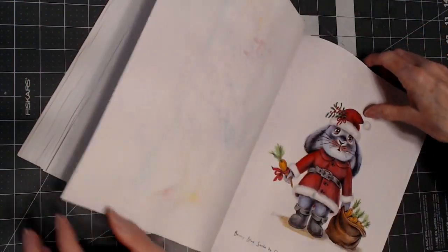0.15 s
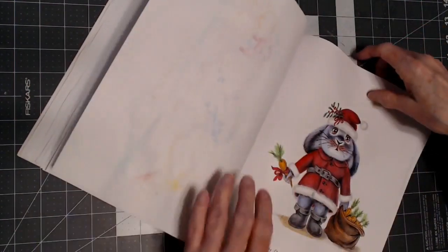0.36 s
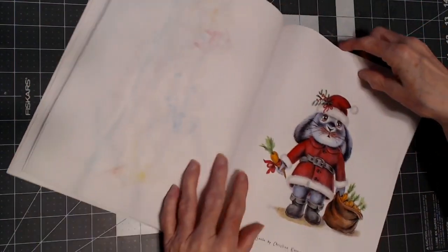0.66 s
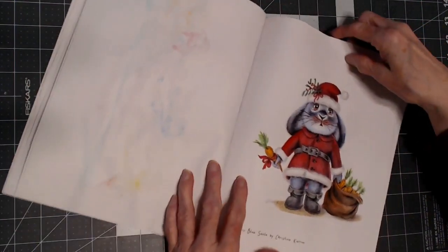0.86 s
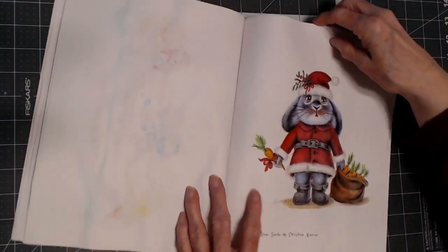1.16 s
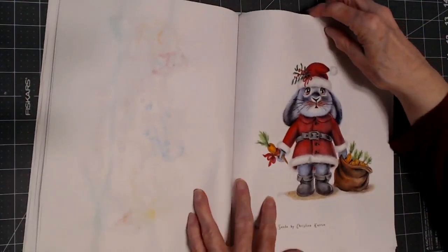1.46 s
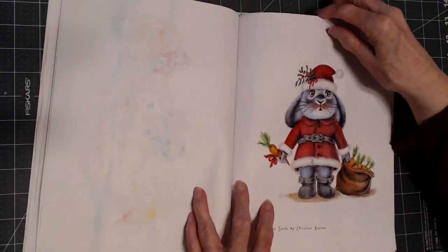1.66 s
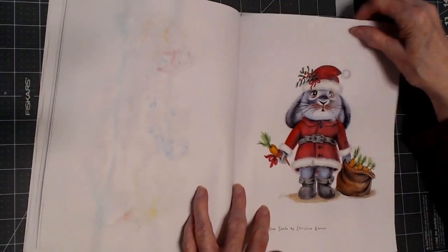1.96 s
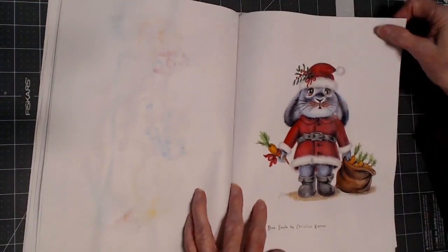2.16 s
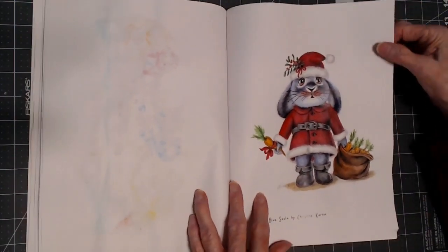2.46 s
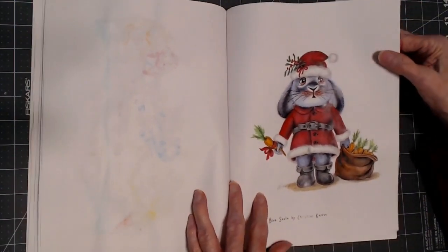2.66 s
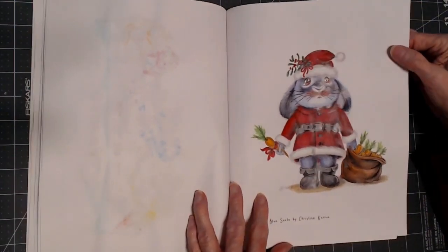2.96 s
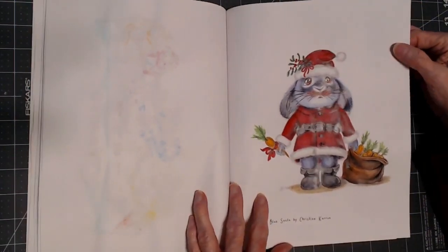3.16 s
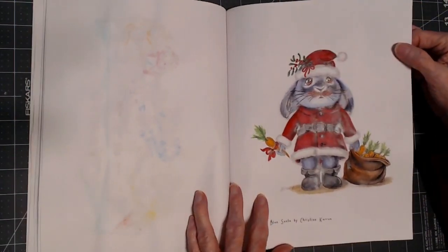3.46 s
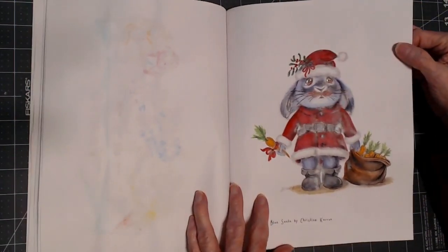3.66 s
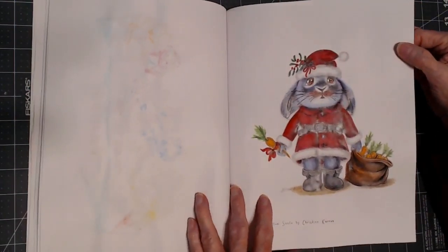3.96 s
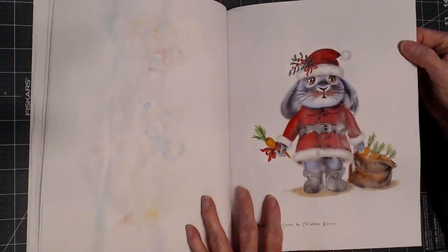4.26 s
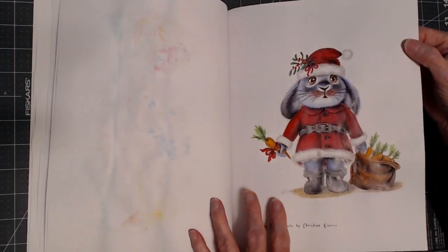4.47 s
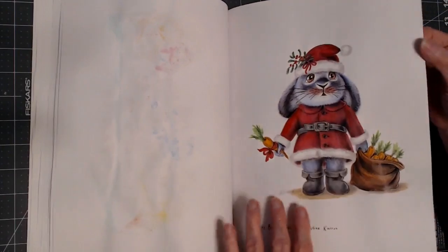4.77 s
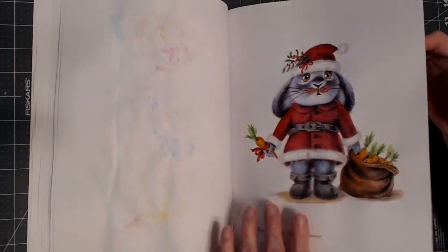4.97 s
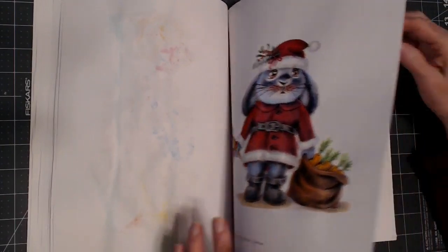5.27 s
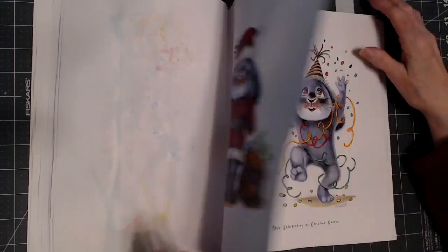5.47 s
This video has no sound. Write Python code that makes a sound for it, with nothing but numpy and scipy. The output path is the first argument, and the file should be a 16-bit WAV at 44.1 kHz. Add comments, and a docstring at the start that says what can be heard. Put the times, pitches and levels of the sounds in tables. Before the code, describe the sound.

Stiff paper page snaps over and is smoothed with dry rustles, then quiet, then more turning as a vehicle pulls away outside.

```python
"""Turning the pages of a large picture book

A page flops over, a palm smooths it, fingers slide to the corner and lift the next page.
Short noise bursts make the snaps of the stiff sheets; random grains through filters make hiss and hollow rubbing.
From halfway on a vehicle pulls away outside: sine tones of rising pitch over low, filtered noise."""
import sys
import numpy as np
from scipy import signal
from scipy.fft import rfft, irfft, next_fast_len
from scipy.io import wavfile
from scipy.ndimage import uniform_filter1d

SR = 44100
rng = np.random.default_rng(int(sys.argv[2]) if len(sys.argv) > 2 else 0)


def materialize(psi):
    """Save the field psi as 16-bit PCM at rate SR to the path in sys.argv[1].

    A 1-D psi becomes a single channel; in a 2-D psi each row is a channel.
    """
    bounded = np.clip(np.atleast_2d(psi).T, -1, 1)
    quanta = np.round(bounded * 32767).astype(np.int16)
    wavfile.write(sys.argv[1], SR, quanta)


N = 247842   # length in samples


def from_db(db):
    """Turn decibels into a gain."""
    return 10 ** (np.asarray(db) / 20)


def rms_one(x):
    """Scale a sound to an average strength (rms) of 1."""
    return x / np.sqrt(np.mean(x ** 2) + 1e-20)


def in_time(rows):
    """Join the points of each curve with straight lines, one value per sample."""
    seconds, *columns = np.transpose(rows)
    return [np.interp(np.arange(N) / SR, seconds, column) for column in columns]


def at_hz(points, hz):
    """Read a spectrum between its points, on a log-frequency axis."""
    point_hz, value = np.transpose(points)
    return np.interp(np.log(hz + 1), np.log(point_hz), value)


def panned(x, pan_db):
    """Make the left channel louder than the right by pan_db; a negative value leans right."""
    return x * from_db(np.array([[.5], [-.5]]) * pan_db)


def drift(rate_hz):
    """Smooth, slow noise with spread 1; a higher rate wanders faster."""
    step = 40   # computed at every 40th sample, then joined up
    r = np.exp(-2 * np.pi * rate_hz * step / SR)
    noise = rng.standard_normal(N // step + 2002)
    slow = signal.lfilter([1], [1, -2 * r, r * r], noise)[2000:]
    return np.interp(np.arange(N) / step, np.arange(len(slow)), rms_one(slow))


# How wide the stereo sound is. Each row: frequency in Hz, level of side over mid in dB.
STEREO_WIDTH = [(25, -10), (90, -17), (300, -10), (700, -12), (1400, -2.5), (3000, -0.5), (9000, -10.5),
                (15000, -7.5)]


def coloured(pair, colour):
    """Filter two unrelated signals, as mid and side, into a stereo sound of this colour; rms 1."""
    n = pair.shape[1]
    size = next_fast_len(n)
    hz = np.arange(size // 2 + 1) * SR / size
    top_fade = 1 + (hz / (2 * colour[-1][0])) ** 2   # fades the treble beyond the last point
    mid, side = rfft(pair, size) * from_db(at_hz(colour, hz)) / top_fade
    side = side * from_db(at_hz(STEREO_WIDTH, hz))
    return rms_one(irfft([mid + side, mid - side], size)[:, :n])


def resonate(x, hz, width_hz):
    """Ring at one frequency: a resonance with a peak gain of about 1."""
    r = np.exp(-np.pi * width_hz / SR)
    feedback = [1, -2 * r * np.cos(2 * np.pi * hz / SR), r * r]
    return signal.lfilter(np.array([1, 0, -1]) * (1 - r * r) / 2, feedback, x)


def glide(x, hz, width_hz, size=256, order=2):
    """A steep resonance whose pitch and width move block by block, at even power; rms 1."""
    radius = np.exp(-np.pi * np.abs(width_hz) / SR)
    out = x.copy()
    for _ in range(order):
        state = np.zeros((2, 2))
        for i in range(0, N, size):
            r = radius[i]
            feedback = [1, -2 * r * np.cos(2 * np.pi * hz[i] / SR), r * r]
            block = (1 - r * r) / 2 * out[:, i:i + size]
            out[:, i:i + size], state = signal.lfilter([1, 0, -1], feedback, block, zi=state)
    return rms_one(out / np.sqrt(1 - radius))


def held(start, length, attack_s, release_s):
    """A loudness curve that rises, holds until its length is over and dies away."""
    t = np.arange(N) / SR - start
    return np.clip(t / attack_s, 0, 1) * np.exp(-np.maximum(t - length, 0) / release_s)


def off_table(x, strengths):
    """Table, hands and nearby pages throw sound back within 4 ms, colouring it at about the same power."""
    out, n = x.copy(), x.shape[1]
    for strength in strengths:
        lag = int(rng.uniform(.0003, .004) * SR)
        out += strength * np.pad(x, [(0, 0), (lag, 0)])[:, :n]
    return out / np.sqrt(1 + np.sum(np.square(strengths), axis=0))


# Colour of the quiet room. Each row: frequency in Hz, level in dB.
ROOM_COLOUR = [(20, -1), (53, -19.5), (107, -5.5), (204, -21.5), (480, -29), (610, -24), (800, -33),
               (4060, -52.5), (16000, -60)]


def quiet_room(level_db=-61.5):
    """Soft, steady filtered noise is the sound of the quiet room."""
    return from_db(level_db) * coloured(rng.standard_normal((2, N)), ROOM_COLOUR)


# Faint high tones. Each row: frequency in Hz, level in dB relative to the hum.
FAINT_HIGH_TONES = [(3900, -46.5), (7800, -52.5), (11750, -56)]


def faint_high_tones(hum):
    """Faint high tones that follow the level of the hum: it is multiplied by wandering sines."""
    tones = 0
    for hz, db in FAINT_HIGH_TONES:
        turn = 2 * np.pi * np.cumsum(hz + 10 * drift(40)) / SR
        tones = tones + hum * from_db(db) * np.sin(turn)
    return tones


# Two tiny dry clicks. Each row: time in seconds, strength at the start in dB.
DRY_CLICKS = [(3.4276, -46.5), (3.928, -39)]
# Colour of the clicks. Each row: frequency in Hz, level in dB.
CLICK_COLOUR = [(800, -6), (5000, 0), (15000, -8)]


def clicks(fade_s=.00012):
    """Two tiny dry clicks: noise that starts at once and dies within a millisecond."""
    t = np.arange(N) / SR
    strength = 0
    for s, db in DRY_CLICKS:
        strength = strength + from_db(db) * (t >= s) * np.exp(-np.abs(t - s) / fade_s)
    return strength * coloured(rng.standard_normal((2, N)), CLICK_COLOUR)


# Room modes set booming by the rumble. Each row: start in seconds, length in seconds,
# pitch in Hz, level in dB (around which it wavers).
ROOM_BOOMS = [(2.742, 0.043, 105.8, -47), (2.784, 0.15, 104, -40.5), (2.993, 0.052, 106.3, -44.5),
              (3.211, 0.038, 104.1, -49.5), (3.311, 0.032, 99.4, -35), (4.03, 0.49, 106, -45.5),
              (4.65, 0.83, 106.1, -44.5), (4.539, 0.092, 281, -53), (4.766, 0.9, 374.8, -60.5),
              (5.429, 0.13, 227.7, -48)]


def booms(attack_s=0.04, release_s=0.025, pitch_wander_hz=7.42 / 2, waver_db=3):
    """Each room mode is a slightly wandering sine that swells unevenly."""
    out = 0
    for start, length, hz, db in ROOM_BOOMS:
        turn = 2 * np.pi * np.cumsum(hz + pitch_wander_hz * drift(14.4)) / SR
        uneven_db = waver_db * np.tanh(drift(23))
        out = out + held(start, length, attack_s, release_s) * from_db(db + uneven_db) * np.sin(turn)
    return out


# The vehicle gathers speed. Each row: time in seconds, engine firing rate in Hz,
# level of the drone in dB before the drone gain.
ENGINE_SPEED = [(3.36, 94.7, -38), (3.54, 100.5, -30), (3.76, 108.8, -27), (3.8, 114.9, -36),
                (3.89, 115.6, -31), (4.0, 116.6, -28), (4.22, 132.3, -39.5), (4.4, 132.8, -45),
                (4.51, 141.3, -35.5), (4.57, 139.3, -51.5), (4.66, 142.9, -36.5), (4.83, 145.1, -53),
                (4.9, 149, -36.5), (5.12, 157.2, -63), (5.15, 155.1, -38.5), (5.4, 162, -49.5),
                (5.5, 169, -70)]
# Overtones of the engine. Each row: multiple of the firing rate, level in dB relative to the road noise.
OVERTONES = [(1.5, -18.5), (2, -10.5)]
# Noise of the vehicle. Each row: time in seconds, road noise in dB, deep rumble in dB.
VEHICLE_NOISE = [(0, -78.5, -79), (2.7, -81, -72.5), (2.82, -62.5, -54.5), (3.22, -82.5, -60.5),
                 (3.36, -61.5, -58.5), (4.05, -48.5, -54.5), (4.5, -53.5, -58.5), (5.62, -47.5, -58)]
# Colours of the road noise and the rumble. Each row: frequency in Hz, level in dB.
ROAD_COLOUR = [(25, -14.5), (55, 0), (80, -3.5), (140, 4.5), (230, -1), (300, -11.5), (400, -12.5),
               (550, -28), (900, -37)]
RUMBLE_COLOUR = [(20, -8), (30, -5.5), (55, 2.5), (80, -8.5), (200, -38.5)]


def vehicle(waver=0.0097, drone_gain_db=-2.0, overtone_waver_db=5, overtone_wander=0.98):
    """Only the lowest engine tones pass the wall: returns the hum (drone, booming room) and the rest."""
    t = np.arange(N) / SR
    firing_hz, drone_db = in_time(ENGINE_SPEED)
    road_db, rumble_db = in_time(VEHICLE_NOISE)
    turn = 2 * np.pi * np.cumsum(firing_hz * (1 + waver * drift(34))) / SR
    pulling = np.clip((t - ENGINE_SPEED[0][0]) / .07, 0, 1)   # the engine fades in over 70 ms
    shudder_db = 1.6 * drift(14)
    drone = pulling * from_db(drone_db + drone_gain_db + shudder_db) * np.sin(turn) * np.sqrt(2)
    # a four-stroke engine sounds whole and half multiples; their paths through the street keep shifting
    overtones = 0
    for multiple, db in OVERTONES:
        strength = from_db(road_db + db + overtone_waver_db * drift(3.1))
        overtones = overtones + pulling * strength * np.sin(multiple * turn + overtone_wander * drift(10))
    road = from_db(road_db) * coloured(rng.standard_normal((2, N)), ROAD_COLOUR)
    rumble = from_db(rumble_db) * coloured(rng.standard_normal((2, N)), RUMBLE_COLOUR)
    return drone + booms(), overtones + road + rumble


# After a buckle or a soft touch the whole sheet flaps. Each row: time in seconds, level in dB, pitch in Hz.
SHEET_FLAPS = [(0.104, -44.5, 434), (0.463, -52.5, 566), (0.574, -54, 553), (1.592, -65.5, 780),
               (1.917, -57.5, 350), (4.213, -49.5, 648.3), (4.412, -63, 600), (4.96, -50, 430),
               (5.078, -39, 319.4), (5.135, -53.5, 465), (5.385, -43.5, 544), (5.498, -51, 296)]
# Colour of a flap. Each row: frequency in Hz, level in dB.
PUFF_COLOUR = [(190, -31), (330, -2.5), (600, 3), (1800, -43)]


def flaps(rise_s=0.0028, t60=0.18, width_hz=130):
    """The whole sheet swings and pushes a soft, low puff of air: a short noise through a resonance."""
    out = np.zeros((2, N + SR))
    t = np.arange(SR // 2) / SR
    for s, db, hz in SHEET_FLAPS:
        strength = np.minimum(t / rise_s, 1) * from_db(-60 * t / t60)
        push = rng.standard_normal((2, len(t))) * strength
        puff = resonate(coloured(push, PUFF_COLOUR), hz, width_hz)
        puff = puff / np.sqrt(np.mean(puff[:, t < .04] ** 2))   # rms 1 over the first 40 ms
        i = round(s * SR)
        out[:, i:i + len(t)] += from_db(db) * puff
    return out[:, :N]


# A hand or a page slides over the paper. Each row: start in seconds, length in seconds, swell in dB
# from start to end, then levels in dB, before the gains in sliding(), of the friction hiss,
# the sheet flutter, the air pocket and the sheet ring.
SLIDING_STROKES = [(-0.02, 0.12, -6, -57.5, -65, -100, -86), (0.086, 0.12, -12, -66, -60, -50.5, -85),
                   (0.147, 0.23, 24.5, -51.5, -59.5, -54.5, -62), (0.348, 0.1, -8, -52.5, -50, -60.5, -69),
                   (0.367, 0.47, -0.5, -61, -62.5, -60, -71), (0.815, 0.27, -27, -62.5, -58.5, -57.5, -94),
                   (1.023, 0.32, -5, -69, -74.5, -69, -78), (1.212, 0.07, 11, -59.5, -66, -64, -68),
                   (1.348, 0.19, -26, -73, -85.5, -72, -102), (1.52, 0.83, -7, -64.5, -76.5, -77, -77.5),
                   (1.703, 0.13, -15, -83, -71, -91, -62), (1.846, 0.083, 6.5, -53, -58, -53, -49.5),
                   (1.926, 0.089, -42.5, -45.5, -49, -43, -53), (1.97, 0.19, 1, -89, -79, -69, -70.5),
                   (2.143, 0.35, 6, -66, -75.5, -83, -80.5), (2.509, 0.26, 6.5, -79.5, -83.5, -81.5, -99.5),
                   (2.858, 0.23, 2.5, -83, -79.5, -80, -76), (3.668, 0.035, 1, -65.5, -68.5, -70.5, -82.5),
                   (4.026, 0.097, -11.5, -71.5, -63, -54.5, -78), (4.388, 0.14, -6.5, -68, -63.5, -70, -79),
                   (4.446, 0.017, -10, -78, -68, -78, -48), (4.537, 0.2, -9.5, -62.5, -68, -91, -69),
                   (4.753, 0.18, 3, -74, -79, -81, -92.5), (4.931, 0.11, -7, -67.5, -62, -73, -82),
                   (5.123, 0.24, -25, -73.5, -89, -83, -63), (5.351, 0.04, 3, -58.5, -44, -53, -46),
                   (5.456, 0.055, -7, -54.5, -52, -39, -59)]


def strokes(attack_s=0.052, release_s=0.02, ease_in_share=0.14, hiss_follows=0.48):
    """Each stroke sets in, swells or eases with pressure and lets go: gains of hiss, flutter, pocket, ring."""
    t = np.arange(N) / SR
    hiss, flutter, pocket, ring = 0, 0, 0, 0
    for start, length, swell_db, hiss_db, flutter_db, pocket_db, ring_db in SLIDING_STROKES:
        # a long stroke sets in more gently
        touch = held(start, length, attack_s + ease_in_share * length, release_s)
        pressure = from_db(swell_db * (np.clip((t - start) / length, 0, 1) - .5))
        power = (touch * pressure) ** 2
        # only a share of the swell reaches the hiss
        hiss = hiss + (from_db(hiss_db) * touch * pressure ** hiss_follows) ** 2
        flutter = flutter + from_db(flutter_db) ** 2 * power
        pocket = pocket + from_db(pocket_db) ** 2 * power
        ring = ring + from_db(ring_db) ** 2 * power
    return np.sqrt([hiss, flutter, pocket, ring])


def fibres(per_s, spread_db):
    """Fibres catch and let go: random slips of uneven size."""
    slips = rng.random(N) < per_s / SR
    size_db = spread_db * np.minimum(rng.exponential(1, N), 5)
    return slips * from_db(size_db) * rng.standard_normal((2, N))


# Colour of crackling, slipping paper. Each row: frequency in Hz, level in dB.
SLIP_COLOUR = [(400, -5), (1000, -6), (5000, -10), (12000, -24)]


def crackle(per_s=70, spread_db=-2.5, width_share=0.26, count=9):
    """Tiny creases give way in a rubbed sheet: random grains ring at several pitches."""
    grains = 0
    for hz in np.geomspace(700, 6500, count):
        grains = grains + resonate(fibres(per_s, spread_db), hz, width_share * hz) / np.sqrt(hz)
    return coloured(grains, SLIP_COLOUR)


# The air pocket under the sheet changes pitch as the page billows and is pressed flat, and blurs
# when its edge is lifted. Each row: time in seconds, pitch in Hz, width of the resonance in Hz.
POCKET_CURVE = [(0.12, 745, 400), (0.25, 845, 300), (0.365, 845, 340), (0.405, 547, 340), (0.62, 617, 220),
                (0.79, 790, 240), (0.90, 700, 330), (1.42, 804, 260), (1.85, 794, 330), (1.9, 860, 1700),
                (1.98, 810, 1600), (2.04, 735, 190), (5.62, 720, 600)]
# The free part of the sheet rings lower the longer it is. Each row: time in seconds, pitch in Hz.
RING_CURVE = [(0.26, 4900), (0.355, 3265), (0.42, 2430), (0.62, 2780), (1.85, 2906), (1.89, 4800),
              (1.99, 4830), (2.04, 1580), (2.18, 1530), (2.3, 2910), (4.6, 2200), (5.1, 3194)]
# Colours of the sheet flutter and the friction hiss. Each row: frequency in Hz, level in dB.
FLUTTER_COLOUR = [(300, -26), (900, -4), (1400, 5), (2400, 3.5), (3200, 4.5), (4600, -7.5), (8000, -46.5)]
HISS_COLOUR = [(1500, -14), (3000, -12.5), (4700, -2), (7400, -0.5), (8100, -14), (10500, -14),
               (12500, -20), (15000, -21)]


def sliding(pocket_gain_db=-1, octave_db=-10, flutter_gain_db=-2, hiss_gain_db=-1, ring_gain_db=-1,
            crackle_db=-2, ring_width_hz=880, echo=0.95, catch_db=8, count=7):
    """Slipping fibres hiss, shake the sheet and ring the two lowest modes of the air pocket."""
    hiss_gain, flutter_gain, pocket_gain, ring_gain = strokes()
    pocket_hz, pocket_width_hz = in_time(POCKET_CURVE)
    ring_hz, = in_time(RING_CURVE)
    # now and then a coarser fibre catches
    slips = fibres(per_s=6000, spread_db=-0.5) + from_db(catch_db) * fibres(per_s=200, spread_db=-7)
    slips = slips * from_db(2.6 * drift(110))   # the skin sticks and slips, so the grains come in clumps
    air = coloured(slips, SLIP_COLOUR)
    low_mode = glide(air, pocket_hz, pocket_width_hz)
    high_mode = glide(air, 2 * pocket_hz, 2 * pocket_width_hz)
    pocket = pocket_gain * from_db(pocket_gain_db) * (low_mode + from_db(octave_db) * high_mode)
    # reflections come and go as the hands move
    slips = off_table(slips, [echo * drift(6.0) for _ in range(count)])
    ring = glide(coloured(slips, SLIP_COLOUR), ring_hz, np.full(N, ring_width_hz))
    ring = ring_gain * from_db(ring_gain_db) * ring
    shaking = from_db(flutter_gain_db) * coloured(slips, FLUTTER_COLOUR)
    flutter = flutter_gain * (shaking + from_db(crackle_db) * crackle())
    hiss = hiss_gain * from_db(hiss_gain_db) * coloured(slips, HISS_COLOUR)
    return panned(pocket, pan_db=-1.5) + panned(flutter + ring + hiss, pan_db=-3.0)


def sheet_ring(t, colour, t60, crack_db, ring_hz, ring_db, ring_width_hz, rise_s, room_db, lead_db,
               room_t60=0.16, lead_s=0.011, crack_s=.002, creases_db=2.0, echo=0.35):
    """The paper strains, cracks at t = 0, and its bending waves die away into the room."""
    crack = from_db(crack_db - 12.5) * np.exp(-np.abs(t) / crack_s)
    creases = rms_one(uniform_filter1d(rng.standard_normal(len(t)), size=130))   # creases keep giving way
    waves = from_db(-60 * t / t60 + creases_db * creases)
    room = from_db(room_db - 60 * t / room_t60)
    strain = from_db(lead_db) * np.exp(-np.abs(t) / lead_s)
    onset = 1 - np.exp(-np.maximum(t, 0) / rise_s)
    strength = strain + np.sqrt(crack ** 2 + waves ** 2 + room ** 2) * onset
    burst = coloured(rng.standard_normal((2, len(t))) * strength, colour)
    burst = burst + from_db(ring_db) * resonate(burst, ring_hz, ring_width_hz)
    burst = off_table(burst, echo * rng.choice([-1, 1], size=4))
    return burst / np.sqrt(np.mean(burst[:, t < .025] ** 2))   # rms 1 until 25 ms after the crack


# The sheet buckles or is tapped. Each row: time in seconds, force as a level in dB, hollow body and
# bright edge in dB relative to it (before the gains in snaps()), air pocket pitch in Hz, sheet ring
# pitch in Hz, first crack in dB before trims, lean to the left in dB.
BUCKLES = [(0.0878, -14.5, -23, -26.5, 844, 3100, 41, -3.5),
           (0.387, -37.5, -11.5, -11.5, 554, 2300, 29, -3.5), (0.4967, -41, -11, -30, 634, 1300, 42, -4.5),
           (0.525, -47, -4, -37, 650, 1200, 39, -2), (0.5656, -42, 1.5, -13, 644, 1950, 46, -1),
           (0.5733, -22, -11.5, -20.5, 637, 2920, 40, -2.5), (0.7475, -39, -6.5, -44, 722, 1550, 32, -2.5),
           (0.9157, -49.5, -3, -10, 673, 1190, 58, -4), (0.9582, -45.5, -4, -15, 717, 1240, 49, -2),
           (1.0196, -45.5, -13.5, -18.5, 830, 1730, 32, -5.5), (1.2032, -49, 11, -23, 735, 1105, 37.5, 0),
           (1.223, -41, -15, -25, 610, 1176, 26, -3), (1.295, -47, -9.5, -14.5, 666, 1300, 36, -2),
           (1.873, -35, -17, -33, 1220, 1240, 38, -9), (2.057, -71, 18, -1, 705, 1540, 17, -3),
           (2.076, -68, 6, -24, 700, 1494, 47, 1), (2.715, -47, -6.5, -39, 667, 1250, 25, -1),
           (3.349, -63, 2, -32.5, 540, 1150, 20.5, -4), (4.0101, -56, 0, -23, 526, 1220, 15, -0.5),
           (4.0708, -41, -11, -22.5, 757, 1650, 40, 0), (4.192, -22.5, -16, -30.5, 956, 1472, 33.5, -3),
           (4.2847, -47.5, -9.5, -31, 756, 1470, 33, 0), (4.3122, -55.5, 0.5, -17.5, 763, 1210, 35.5, -1.5),
           (4.5467, -43, -3.5, -41, 697, 1850, 21, -1), (4.9584, -34, -6, -37, 886, 1380, 32.5, -1.5),
           (5.0296, -48.5, -8, -22, 1090, 1320, 52, -1), (5.0711, -18.5, -19.5, -21.5, 970, 2300, 47, -4.5),
           (5.0827, -19, -13.5, -27.5, 720, 1240, 38, 0.5), (5.1366, -32, -4.5, -34, 1044, 1240, 35.5, -2),
           (5.3748, -25, -17, -41, 609.5, 1440, 9, 3), (5.4074, -21, -15, -29, 682, 1290, 37, -1.5),
           (5.4643, -23.5, -12.5, -29, 823, 1760, 35, -0.5), (5.4954, -36, 3.5, -41, 722, 1190, 44, -2),
           (5.505, -25, -8, -48, 619, 1220, 37, 0.5), (5.5338, -30, -11.5, -29.5, 1017, 1480, 36.5, -2)]
# Colours of the hollow body, the sheet and its edge. Each row: frequency in Hz, level in dB.
BODY_COLOUR = [(180, -30), (300, -12.5), (420, -8), (650, 4), (950, 0), (1300, -0.5), (2000, -36.5)]
SHEET_COLOUR = [(600, -25), (950, -7), (1250, -2.5), (1750, 1), (2400, -3), (3300, -5.5), (3900, -11.5),
                (4700, -41.5), (7000, -26)]
EDGE_COLOUR = [(2500, -40.5), (3800, 8.5), (6000, 4.5), (7500, -7), (8100, -9), (11000, -12), (15000, -23)]


def snaps(body_gain_db=-4, sheet_gain_db=-15, edge_gain_db=-4, spread=0.053, firm_db=-28,
          strain_db=-21, strain_growth=0.21, body_delay_growth=0.04):
    """Each buckle shakes the air under the page, the sheet and its edge with bursts of noise."""
    out = np.zeros((2, N + SR))
    t = np.arange(-SR // 40, SR // 3) / SR   # starts 25 ms before the crack
    for s, db, body_db, edge_db, pocket_hz, sheet_hz, crack_db, pan_db in BUCKLES:
        force_db = db - firm_db
        lead_db = strain_db + strain_growth * min(force_db, 0)   # a light tap hardly strains the sheet first
        # a hard buckle spreads through the sheet, a light tap dies under the finger
        lasting = from_db(spread * force_db)
        body_rise_s = 0.0068 * from_db(body_delay_growth * force_db)   # a harder buckle swells more slowly
        hollow_db = 7.0 + 1.54 * max(body_db, 0)   # a fingertip on a closed pocket rings at one clear pitch
        body = sheet_ring(t, BODY_COLOUR, 0.12 * lasting, crack_db - 5.5, pocket_hz, ring_db=hollow_db,
                          ring_width_hz=55, rise_s=body_rise_s, room_db=-22.5, lead_db=lead_db)
        sheet = sheet_ring(t, SHEET_COLOUR, 0.084 * lasting, crack_db, sheet_hz, ring_db=0.0,
                           ring_width_hz=570, rise_s=0.0075, room_db=-6, lead_db=lead_db)
        edge = sheet_ring(t, EDGE_COLOUR, 0.25 * lasting, crack_db - 2.0, sheet_hz, ring_db=8.5,
                          ring_width_hz=150, rise_s=0.002, room_db=-15.0, lead_db=lead_db)
        snap = from_db(body_db + body_gain_db) * body
        snap = snap + from_db(sheet_gain_db) * sheet
        snap = snap + from_db(edge_db + edge_gain_db) * edge
        i = round((s + t[0]) * SR)
        out[:, i:i + len(t)] += panned(from_db(db) * snap, pan_db)
    return out[:, :N]


def scene():
    """A quiet room, the vehicle outside and the paper close by, with faint high tones and two clicks."""
    hum, vehicle_rest = vehicle()
    outside = panned(hum + vehicle_rest, pan_db=-1.6)
    high_tones = panned(faint_high_tones(hum), pan_db=-1.6)
    paper = flaps() + sliding() + snaps()
    return quiet_room() + high_tones + clicks() + outside + paper


def record(dry, cutoff_hz=15300):
    """Cut the treble steeply above the cutoff."""
    low_pass = signal.ellip(10, .2, 80, cutoff_hz, fs=SR, output="sos")
    return signal.sosfilt(low_pass, dry)


dry = scene()
out = record(dry)
materialize(out)
```